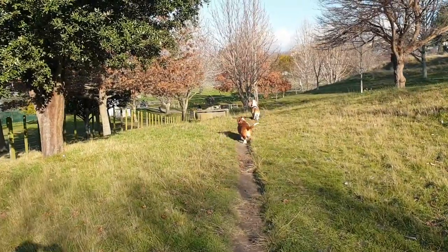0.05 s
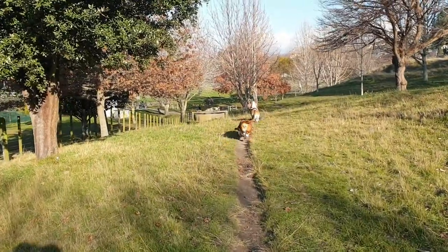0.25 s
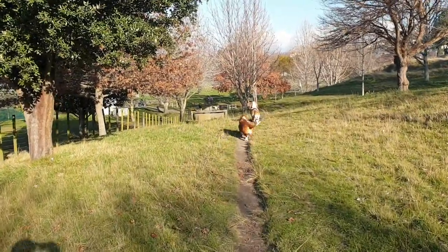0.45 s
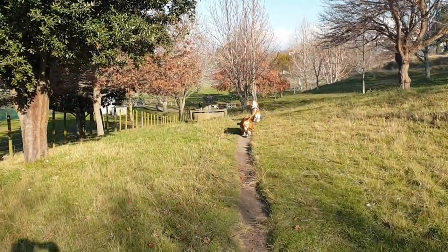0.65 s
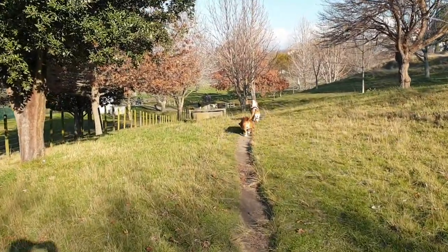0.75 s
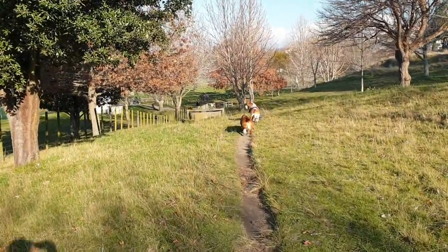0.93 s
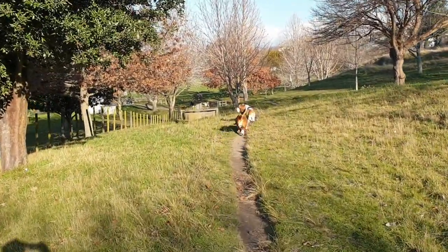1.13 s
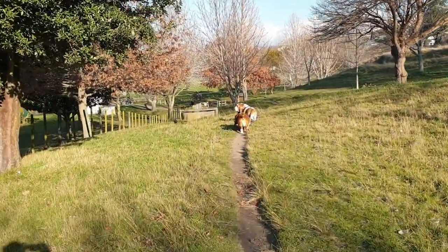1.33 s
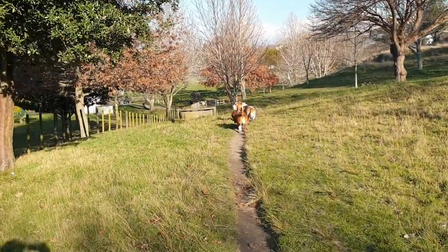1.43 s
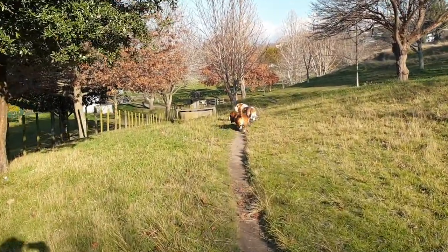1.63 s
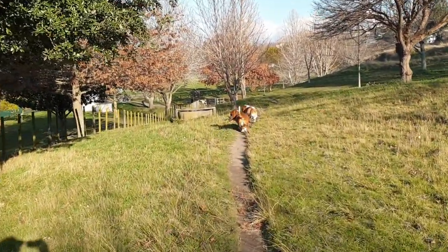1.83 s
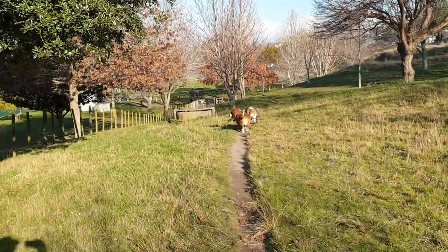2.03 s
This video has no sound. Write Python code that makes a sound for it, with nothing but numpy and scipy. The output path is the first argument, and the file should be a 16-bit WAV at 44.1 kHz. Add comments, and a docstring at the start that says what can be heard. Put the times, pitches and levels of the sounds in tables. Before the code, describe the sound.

Footsteps on a dirt track, heard from a microphone carried by the walker: low dull thuds mostly on the right, cloth and grass rustle, small knocks and crackles, over quiet open air with faint birds.

```python
"""Someone walks along a dirt track through park grass, carrying the microphone, for about two seconds.
From the start there is a quiet hush and a low rumble (filtered noise), and clothes and grass rustle
(grainy noise). At once the thuds begin (short low tones), mostly on the right, and dry stalks crackle
(bursts of clicks). Knocks (short rings), ticks and scuffing soles (noise bursts) soon join in.
Birds call from 0.4 s (gliding whistles with an echo), and a thin falling trill comes near 1.5 s."""
import sys
import numpy as np
from scipy import signal
from scipy.fft import rfft, irfft
from scipy.io import wavfile
from scipy.ndimage import uniform_filter1d

SR = 44100
rng = np.random.default_rng(int(sys.argv[2]) if len(sys.argv) > 2 else 0)


def to_wav(s):
    """Save 16-bit WAV."""
    ch = np.atleast_2d(s).T  # columns
    pcm = np.round(np.clip(ch, -1, 1) * 32767)  # PCM
    wavfile.write(sys.argv[1], SR, pcm.astype(np.int16))


N = 91683  # samples in the scene

# In every table, left-right/dB is the left level compared with the right.
# In every colour table, level/dB is only the balance between pitches.

# Outdoor hush, from bass to treble: [f/Hz, level/dB]
HUSH_COLOUR = [(25, 6.5), (55, 4), (100, 4), (200, -7), (400, -11.5), (700, -21.5), (1200, -27.5),
               (2300, -35), (3300, -40.5), (4500, -47.5), (6500, -52), (9000, -53.5), (11500, -46),
               (15500, -45)]
HUSH_LEFT_DB, HUSH_RIGHT_DB = -50.5, -49.5

# Rise and fall of the moving body's rumble, before the boost: [t/s, level/dB]
RUMBLE_LEVEL = [(0, -38.5), (.2, -38), (.36, -37), (.46, -47.5), (.57, -46), (.63, -44), (.69, -36),
                (.86, -36), (.92, -42.5), (1.03, -44.5), (1.11, -52.5), (1.21, -51.5), (1.28, -35.5),
                (1.35, -36), (1.4, -40.5), (1.55, -40.5), (1.68, -48), (1.84, -53.5), (1.92, -43.5),
                (2.08, -41.5)]
# Tone of the rumble: [f/Hz, level/dB]
RUMBLE_COLOUR = [(35, 3.5), (55, -0.5), (80, 2), (115, -0.5), (165, -9.5), (210, -17.5), (300, -26.5),
                 (450, -33), (900, -42.5)]
RUMBLE_BOOST_DB, RUMBLE_PAN_DB = 6.5, -13

# Rustle with the stride, before the boosts: [t/s, lower resonance level/dB, upper resonance level/dB]
RUSTLE_LEVELS = [(0, -57, -60.5), (.06, -59.5, -57.5), (.1, -59, -66), (.21, -56, -65), (.36, -60.5, -65),
                 (.48, -74, -71), (.6, -67, -71.5), (0.791, -59.5, -62.5), (.89, -61.5, -60.5),
                 (.97, -65, -67), (1.09, -72, -71), (1.17, -64.5, -66), (1.3, -64, -64), (1.37, -59.5, -57),
                 (1.46, -64, -66), (1.54, -66, -66.5), (1.62, -57, -65.5), (1.68, -67, -66),
                 (1.77, -65.5, -64), (1.86, -78, -76), (1.93, -65, -64), (1.99, -59, -63),
                 (2.08, -73.5, -69)]
# Lower resonance of the rustle: [f/Hz, level/dB]
RUSTLE_COLOUR = [(300, -17), (700, 0.5), (1100, -5.5), (1500, -2), (1860, 7), (2300, -3.5), (2800, -13),
                 (3600, -26), (4400, -35)]
# Upper resonance, the swish: [f/Hz, level/dB]
SWISH_COLOUR = [(2400, -12.5), (3000, -8), (3570, 4), (3950, -4.5), (4350, -23), (5200, -24), (6200, -27.5),
                (7000, -28), (9000, -50.5), (15000, -37)]
RUSTLE_BOOST_DB, SWISH_BOOST_DB = 3, 0.5
RUSTLE_PAN_DB, RUSTLE_GRAIN_DB = -21.5, 1

# Thuds of the footfalls and the jolts after them: [t/s, level/dB, f/Hz, time to peak/s, left-right/dB]
THUDS = [(.002, -35, 71.6, 0.029, -3), (.086, -20, 99.6, 0.014, -24), (0.126, -23, 68.4, 0.0092, -12.5),
         (0.197, -18.5, 75, 0.011, -34), (.238, -24, 83.4, 0.0062, -26), (0.309, -16.5, 57.5, 0.011, -24),
         (0.348, -29, 69.5, 0.023, -20), (.664, -14.5, 70.8, .015, -31.5), (0.689, -17, 70.4, 0.0097, -37),
         (.748, -27.5, 86.9, 0.021, -17.5), (.822, -18.5, 91, 0.0077, -38), (0.855, -22, 83, 0.0066, -18),
         (0.949, -26, 67, 0.021, -25), (1.045, -25, 81.5, 0.0078, -14), (1.23, -22, 67, 0.013, -38),
         (1.306, -19, 77, 0.021, -36), (1.336, -24, 67.3, 0.017, -34), (1.426, -24, 71, 0.014, -35),
         (1.507, -33, 63, 0.028, -33), (1.691, -30.5, 62.7, 0.0061, -0.5), (1.761, -24.5, 55, 0.0074, -23),
         (1.878, -29, 64.7, 0.017, 5), (1.93, -25.5, 61, 0.01, -18), (2.008, -21, 60.8, 0.0088, -8)]

# Dry stalks crackling: [t/s, level/dB, decay/s, left-right/dB, crisp treble level against the rest/dB]
CRACKLES = [(.018, -65.5, 0.037, -5.5, -14), (.135, -71, .015, -10, -5), (.225, -65, 0.081, -10, -18),
            (.392, -66.5, 0.013, -6, -4), (.424, -66, 0.018, -11, -18), (.728, -67, 0.0087, -2, -7),
            (0.767, -77, 0.038, 0, -2), (0.852, -71, 0.024, -5, -12), (.960, -66, 0.0094, -9, -13),
            (1.059, -68.5, 0.022, -5, -1), (1.330, -56, 0.01, -8, -2.5), (1.347, -59, 0.062, -11, -10),
            (1.60, -70.5, 0.032, 0, -9), (2.062, -70, .004, -1, -5)]
# Main tone of the crackle: [f/Hz, level/dB]
CRACKLE_COLOUR = [(2000, 0), (3600, -6), (4400, -3), (5200, -2), (6200, -8.5), (7500, -11.5), (9000, -22)]
# Its crisp treble: [f/Hz, level/dB]
CRISP_COLOUR = [(5500, -19), (7300, -7), (9500, -7), (11500, 6), (15500, 9)]
CRACKLE_GRAIN_DB, CRACKLE_ATTACK_S = 4, 0.0006

# Sharper knocks in the hand-held body: [t/s, level/dB, f/Hz, left-right/dB]
KNOCKS = [(.163, -24.5, 130, -25), (.168, -24.5, 316, -28), (0.188, -21, 174, -22),
          (.208, -24.5, 260, -6.5), (.283, -27, 160, -15), (0.671, -29.5, 230, -28),
          (.695, -20.5, 175, -20.5), (0.782, -25.5, 169, -13.5), (0.852, -23, 180, -22.5),
          (.872, -27.5, 192, -20), (1.276, -22.5, 176, -22), (1.343, -19, 160, -17),
          (1.356, -31.5, 290, -2.5)]
# Tone of the rattle in each knock: [f/Hz, level/dB]
KNOCK_COLOUR = [(40, 6), (100, 1), (180, 9.5), (330, -14), (520, -26.5), (900, -50), (2000, -70.5)]
KNOCK_DECAY_S, KNOCK_RATTLE_DB = 0.0034, -8

# Single snaps and ticks: [t/s, level/dB, f/Hz, decay/s, left-right/dB]
TICKS = [(.2314, -62, 5300, 0.0016, -17), (1.3308, -51, 5300, 0.0026, -10),
         (1.351, -47.5, 5120, 0.0025, -13), (1.511, -42.5, 3600, 0.0018, -18)]
TICK_EDGE = 1.081  # frequency ratio from one point of a tick's colour to the next

# Soles scuffing the track: [t/s, level/dB, rise/s, decay/s]
SCUFFS = [(.281, -48, 0.0018, .004), (.847, -41.5, 0.0051, 0.013), (1.062, -47.5, 0.0019, 0.0034),
          (1.353, -48, 0.0047, 0.023), (1.426, -49, 0.0042, 0.019), (1.970, -45, 0.034, .028)]
# Tone of the scuffs: [f/Hz, level/dB]
SCUFF_COLOUR = [(250, -3.5), (600, -7), (1000, -1), (1500, 3.5), (2100, -3), (2800, -10.5), (3500, -3.5),
                (4400, -28), (8000, -40.5)]
SCUFF_PAN_DB = -31.5

# Single bird notes: [t/s, length/s, start f/Hz, end f/Hz, level/dB]
CHIRPS = [(.415, .07, 7600, 7100, -77), (.482, .028, 2600, 2520, -61), (.625, .04, 2900, 3350, -64),
          (.748, .03, 3450, 3200, -59), (1.07, .2, 9000, 8400, -83), (1.135, .04, 5000, 4000, -70),
          (1.162, .03, 3950, 3450, -54)]
# Notes of a thin falling trill: [t/s, level/dB, start f/Hz, end f/Hz, upper voice against lower/dB]
TRILL = [(1.460, -69, 7570, 6600, -23), (1.490, -59.5, 7760, 6160, -14), (1.522, -58.5, 7770, 6440, -10),
         (1.556, -58.5, 7960, 6230, -13), (1.583, -63, 7530, 7050, -16.5), (1.612, -67, 7620, 6530, -24)]
TRILL_NOTE_S, TRILL_UPPER_RATIO, TRILL_UPPER_DELAY_S = 0.034, 1.117, 0.011
BIRD_WAVER = 0.022  # typical random drift of the pitch, as a fraction of it
BIRD_PAN_DB = -14
ECHO_DB, ECHO_DECAY_S, ECHO_PAN_DB = -7, 0.075, -4.5

TOP_HZ = 15850  # upper limit of the recorder


def undb(db):
    """Turn decibels into a gain."""
    return 10 ** (np.asarray(db) / 20)


def times():
    """Time of every sample in seconds."""
    return np.arange(N) / SR


def follow(curve):
    """Gain that moves in straight dB lines between the (s, dB) points of a curve."""
    t, db = np.array(curve).T
    return undb(np.interp(times(), t, db))


def response(points):
    """Gain per frequency from (Hz, dB) points, falling away outside them, with an average power of 1."""
    hz, db = np.array(points, float).T
    f = np.maximum(np.arange(N // 2 + 1) * SR / N, 1)
    gain = undb(np.interp(np.log(f), np.log(hz), db))
    gain *= np.minimum(f / hz[0], 1) ** 2   # below the first point
    gain *= np.minimum(hz[-1] / f, 1) ** 2  # above the last point
    return gain / np.sqrt(np.mean(gain ** 2))


def colour(x, points):
    """Give a sound the tone described by (Hz, dB) points."""
    return irfft(rfft(x) * response(points), N)


def walk(rate):
    """Smooth random motion with a spread of 1 and about `rate` new values a second."""
    hold = max(int(SR / rate), 2)
    steps = np.repeat(rng.standard_normal(N // hold + 1), hold)
    smooth = uniform_filter1d(steps, hold)[:N]
    return smooth / smooth.std()


def pair(shared):
    """Left and right noise; `shared` is the part of the power that both have in common."""
    common = np.sqrt(shared) * rng.standard_normal(N)
    separate = np.sqrt(1 - shared) * rng.standard_normal((2, N))
    return common + separate


def place(pan_db):
    """Gains for left and right: the right is full, the left is offset by pan_db."""
    return np.array([[undb(pan_db)], [1.0]])


def burst(start, decay, attack):
    """Loudness shape of one event: a smooth rise and an exponential fall."""
    age = np.maximum(times() - start, 0)
    return (1 - np.exp(-age / attack)) * np.exp(-age / decay)


def grains(rate, spread_db):
    """Uneven sizes of tiny contacts, as a random gain with an average power of 1."""
    gain = undb(spread_db * walk(rate))
    return gain / np.sqrt(np.mean(gain ** 2))


def hush():
    """Light air and distant surroundings: steady noise whose level drifts gently at random."""
    air = colour(pair(shared=0.41), HUSH_COLOUR)
    levels = undb([[HUSH_LEFT_DB], [HUSH_RIGHT_DB]])
    return air * levels * undb(1.2 * walk(4))


def rumble():
    """Low shaking of the moving body: deep noise that rises and falls."""
    shaking = colour(pair(shared=0.29), RUMBLE_COLOUR)
    return shaking * follow(RUMBLE_LEVEL) * undb(RUMBLE_BOOST_DB) * place(RUMBLE_PAN_DB)


def rustle():
    """Fibres catch and slip, which makes grainy noise and rings two broad resonances."""
    t, body_db, swish_db = np.array(RUSTLE_LEVELS).T
    fibres = pair(shared=0.4) * grains(rate=500, spread_db=RUSTLE_GRAIN_DB)
    body = colour(fibres, RUSTLE_COLOUR) * follow(np.c_[t, body_db + RUSTLE_BOOST_DB])
    swish = colour(fibres, SWISH_COLOUR) * follow(np.c_[t, swish_db + SWISH_BOOST_DB])
    return (body + swish) * place(RUSTLE_PAN_DB)


def thuds():
    """Each jolt is a low tone that swells and dies within a few cycles."""
    out = np.zeros((2, N))
    for start, db, hz, swell, pan_db in THUDS:
        age = np.maximum(times() - start, 0)
        shape = (age / swell * np.exp(1 - age / swell)) ** 2
        tone = np.sin(2 * np.pi * hz * age)
        out += place(pan_db) * undb(db) * shape * tone
    return out


def crackles():
    """Stalks crush in short dense showers of clicks, some crisper than others."""
    clicks = pair(shared=0.11) * grains(rate=1200, spread_db=CRACKLE_GRAIN_DB)
    dry_stalk = colour(clicks, CRACKLE_COLOUR)
    crisp = colour(clicks, CRISP_COLOUR)
    out = np.zeros((2, N))
    for start, db, decay, pan_db, crisp_db in CRACKLES:
        shower = burst(start, decay, CRACKLE_ATTACK_S) * (dry_stalk + undb(crisp_db) * crisp)
        out += place(pan_db) * undb(db) * shower
    return out


def knocks():
    """Short dull bumps of the hand-held body: a damped ring with a little rattle."""
    rattle = undb(KNOCK_RATTLE_DB) * colour(pair(shared=0.46), KNOCK_COLOUR)
    out = np.zeros((2, N))
    for start, db, hz, pan_db in KNOCKS:
        # the root of 2 gives the steady tone a power of 1, like the noise before its cut
        ring = np.sqrt(2) * np.sin(2 * np.pi * hz * (times() - start))
        shape = burst(start, KNOCK_DECAY_S, attack=0.0017)
        out += place(pan_db) * undb(db) * shape * (ring + rattle)
    return out


def ticks():
    """Single snaps: tiny noise bursts, each ringing briefly around one pitch."""
    out = np.zeros((2, N))
    for start, db, hz, decay, pan_db in TICKS:
        snap = pair(shared=0.52) * burst(start, decay, attack=0.0004)
        peak = [(hz / TICK_EDGE ** 2, -22), (hz / TICK_EDGE, -8), (hz, 0),
                (hz * TICK_EDGE, -12), (hz * TICK_EDGE ** 2, -36)]
        out += place(pan_db) * undb(db) * colour(snap, peak)
    return out


def scuffs():
    """Soles rub over the track: short bursts of grainy noise."""
    slide = sum(undb(db) * burst(start, decay, rise) for start, db, rise, decay in SCUFFS)
    rubbing = pair(shared=0.25) * slide * grains(rate=700, spread_db=1.5)
    return colour(rubbing, SCUFF_COLOUR) * place(SCUFF_PAN_DB)


def note(start, length, from_hz, to_hz, db):
    """One gliding whistle whose pitch wavers and whose loudness flutters."""
    progress = np.clip((times() - start) / length, 0, 1)
    glide = from_hz + (to_hz - from_hz) * progress
    hz = glide * (1 + BIRD_WAVER * walk(700))
    whistle = np.sin(2 * np.pi * np.cumsum(hz) / SR)
    shape = np.sin(np.pi * progress) * grains(rate=170, spread_db=1)
    return undb(db) * shape * whistle


def birds():
    """Scattered notes and a two-voiced trill, echoed by the trees as a short fading wash."""
    song = sum(note(*row) for row in CHIRPS)
    for start, db, from_hz, to_hz, upper_db in TRILL:
        song = song + note(start, TRILL_NOTE_S, from_hz, to_hz, db)
        song = song + note(start + TRILL_UPPER_DELAY_S, TRILL_NOTE_S,
                           from_hz * TRILL_UPPER_RATIO, to_hz * TRILL_UPPER_RATIO, db + upper_db)
    trees = rng.standard_normal((2, N)) * burst(0, ECHO_DECAY_S, attack=0.0019)
    trees /= np.sqrt(np.sum(trees ** 2, axis=1, keepdims=True))
    echo = signal.fftconvolve(song[None], trees, axes=1)[:, :N]
    return song * place(BIRD_PAN_DB) + undb(ECHO_DB) * echo * place(ECHO_PAN_DB)


def scene():
    """Add up the open air, the walker and the birds."""
    air = hush()
    walker = rumble() + rustle() + thuds() + crackles() + knocks() + ticks() + scuffs()
    return air + walker + birds()


def record(dry):
    """The recorder thins the deepest bass and cuts the top of the treble."""
    bass_cut = signal.butter(2, 36, "highpass", fs=SR, output="sos")
    top_cut = signal.ellip(10, 0.2, 70, TOP_HZ, fs=SR, output="sos")
    thinned = signal.sosfiltfilt(bass_cut, dry)
    return signal.sosfilt(top_cut, thinned)


dry = scene()
out = record(dry)
to_wav(out)
```